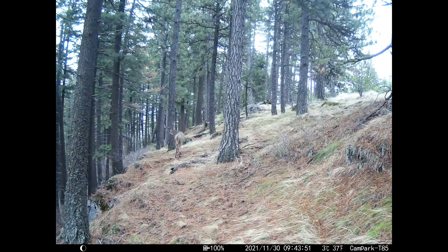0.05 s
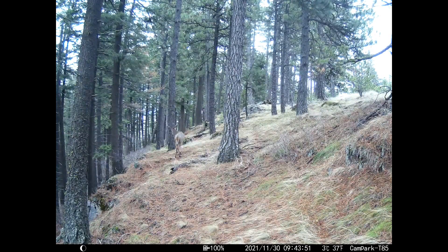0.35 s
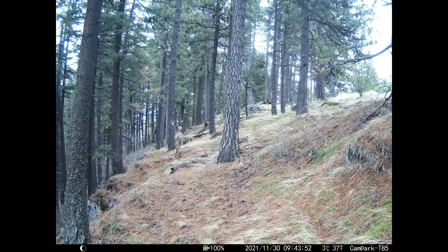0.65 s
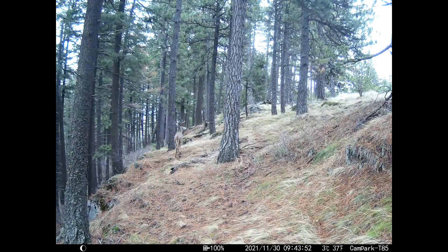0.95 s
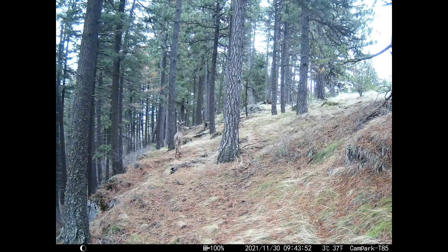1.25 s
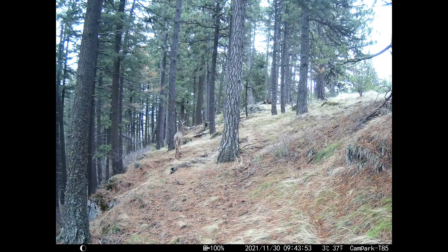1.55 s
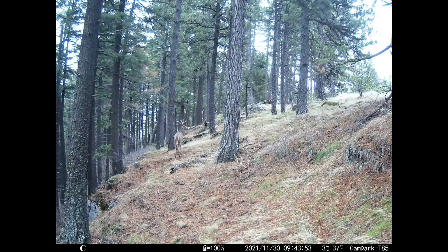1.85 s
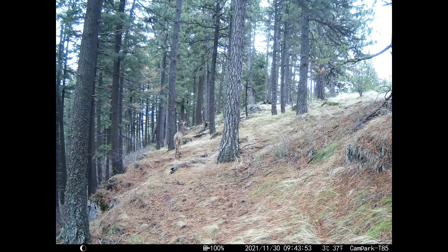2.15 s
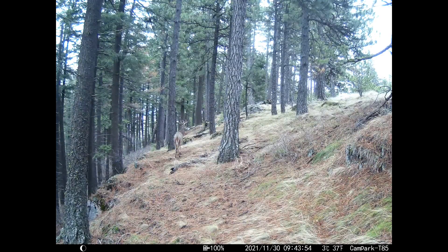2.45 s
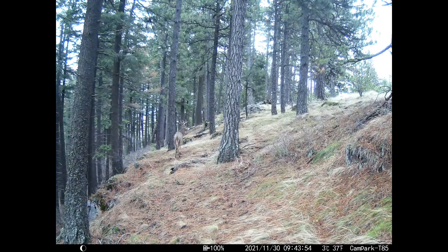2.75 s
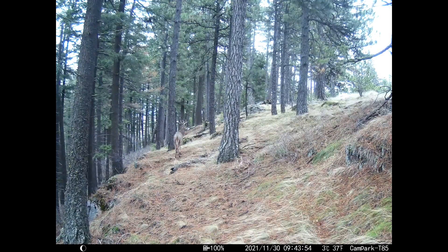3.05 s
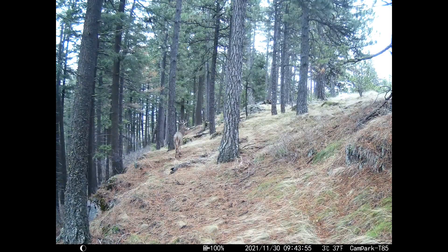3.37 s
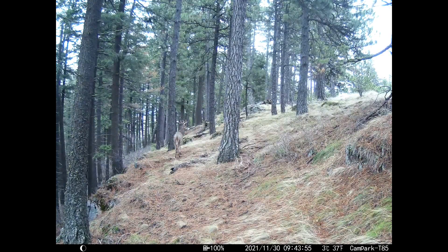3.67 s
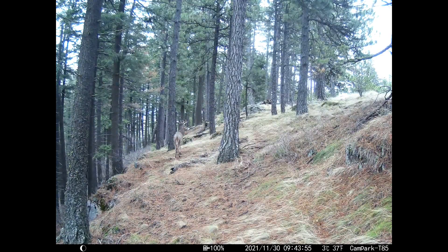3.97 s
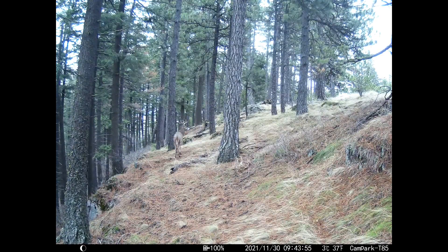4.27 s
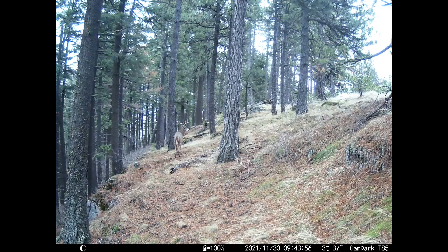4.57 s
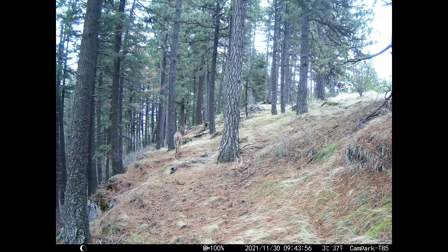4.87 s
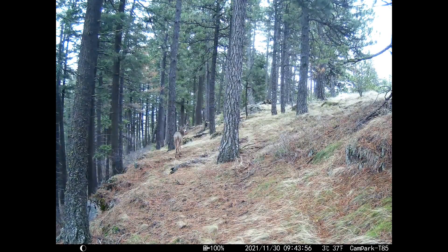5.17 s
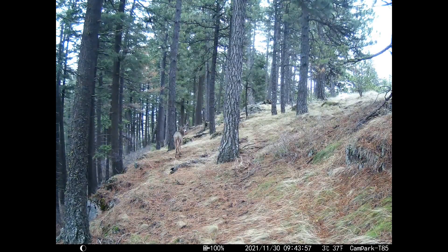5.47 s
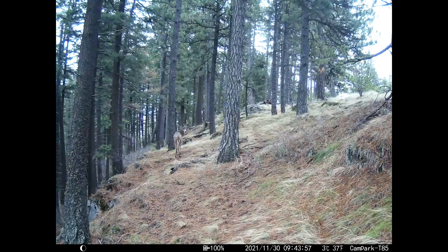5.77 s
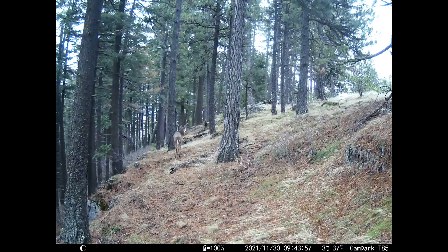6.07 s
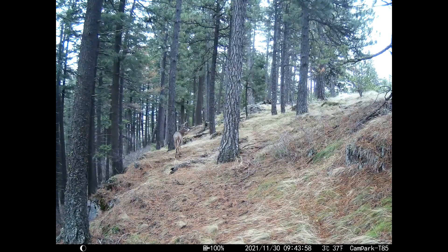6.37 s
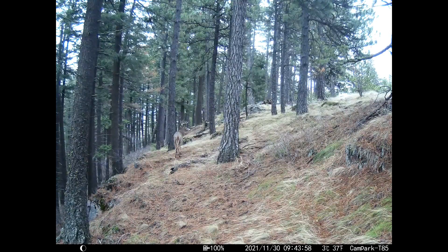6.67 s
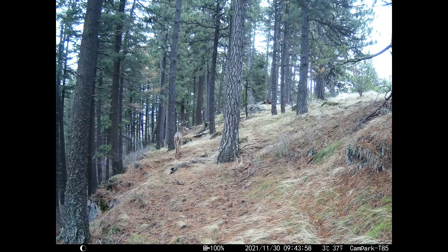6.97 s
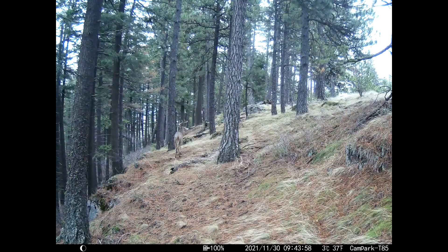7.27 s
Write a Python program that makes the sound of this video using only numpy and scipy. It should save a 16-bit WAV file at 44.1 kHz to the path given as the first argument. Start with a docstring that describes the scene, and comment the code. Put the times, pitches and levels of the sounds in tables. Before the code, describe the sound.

A quiet forest slope is heard in mono, with steady microphone hiss, softly murmuring air and a very faint, wavering low drone throughout. Thin, high chirps sit faintly in the hiss, each about a tenth of a second long and always at the same pitch. They sound like a fluttering electrical whine, with a tiny grainy scratch near the start and end. They come at about 0.3, 1.0, 1.8, 2.8, 3.6, 4.3, 5.3, 6.2 and 6.9 seconds. Light wind rumbles on the microphone, with a small bump at 1.4 seconds. From about 4.1 to 5.1 seconds a gust brings a cluster of low thumps, loudest at 4.2 and strong again at 4.8. A softer, deeper bump follows near 5.8 seconds. The wind then eases, and the hiss and air continue until about 7.4 seconds.

```python
"""Faint, thin chirps from a trail camera on a quiet forest slope. They keep one pitch, most likely a coil
singing under bursts of load, and each catches on a grainy scratch near its start and its end.
Wind rumbles and bumps on the microphone. Behind it sits a bed of softly murmuring air,
amplifier hiss and a faint, wavering low drone. Everything repeats weakly 50 ms later. Mono."""
import sys
import numpy as np
from scipy.fft import rfft, irfft, next_fast_len
from scipy.io import wavfile
from scipy.ndimage import map_coordinates

SR = 44100
rng = np.random.default_rng(int(sys.argv[2]) if len(sys.argv) > 2 else 0)


def materialize(psi):
    """Save the field psi as 16-bit PCM at rate SR to the path in sys.argv[1].

    A 1-D psi becomes a single channel; in a 2-D psi each row is a channel.
    """
    bounded = np.clip(np.atleast_2d(psi).T, -1, 1)
    quanta = np.round(bounded * 32767).astype(np.int16)
    wavfile.write(sys.argv[1], SR, quanta)


N = 327222
T = np.arange(N) / SR

# tone colour of the air in the trees: frequency_hz, relative_db
AIR_SPECTRUM = [(30, -29), (120, -0.5), (220, 0), (420, -2), (650, -6.5), (1000, -13), (2000, -22),
                (5000, -61)]
# tone colour of the amplifier hiss: frequency_hz, relative_db
HISS_SPECTRUM = [(100, 0), (2000, 0), (4200, -.2), (6000, .7), (7800, 1.2), (9300, .5), (11500, -1.2),
                 (14000, -.3), (15000, -2.7), (15700, -8)]
# tones of the drone, before swell and waver: pitch_hz, level_db
DRONE_TONES = [(101, -69), (121.5, -70), (184, -64.5)]
# slow fader ride on the drone: time_s, gain_db
DRONE_RIDE = [(0, -0.5), (.4, 2.5), (1.2, -3), (1.5, 4), (2.6, -4.5), (6.6, -3.5), (7.05, 3.5), (7.42, -3)]
# rise and fall of the wind: time_s, strength_db
WIND_STRENGTH = [(0.0, -63), (0.66, -62.5), (1.49, -57), (2.35, -63.5), (3.47, -63.5), (3.91, -57),
                 (4.28, -46.5), (5.41, -58), (5.66, -61), (5.87, -50), (6.3, -64), (7.42, -55.5)]
# tone colour of wind on the microphone: frequency_hz, relative_db
RUMBLE_SPECTRUM = [(8, -14), (18, 1), (30, -1), (50, -7), (70, -5), (105, -9), (150, -15), (300, -46.5)]
# eddies that bump the microphone: centre_s, level_db, pitch_hz
PUFF_CUES = [(1.399, -37.5, 52), (4.096, -25, 63.5), (4.177, -12, 79.6), (4.206, -25, 90), (4.363, -26, 39),
             (4.485, -22.5, 78), (4.511, -31.5, 36), (4.785, -27, 53.4), (4.811, -17, 50.6),
             (4.866, -29.5, 48.6), (4.906, -29, 50.3), (5.057, -33, 42), (5.836, -23, 34.7),
             (6.002, -33.5, 39.6)]
# tone colour of the rasp in chirps and scratches: frequency_hz, relative_db
RASP_SPECTRUM = [(1000, -23), (2800, 2.5), (4500, 0), (6500, 7), (8500, 2), (10500, -1), (15000, -16)]
# overtones 2 to 5 of the coil, whose fundamental is silent: relative_db
COIL_OVERTONES = [.6, -2.2, -7, -13]
# bursts of load on the coil: start_s, end_s, level_db, swell_db, closing_scratch_db
CHIRP_CUES = [(.31, .44, -64, 0, -60), (1.005, 1.105, -63.5, -2, -70), (1.81, 1.928, -65, 1, -58),
              (2.805, 2.92, -64, 0, -64), (3.615, 3.715, -65.5, 0, -60), (4.325, 4.422, -61.5, 7, -64),
              (5.305, 5.425, -64, 2, -63), (6.205, 6.305, -65.6, 3, -70), (6.905, 7.018, -65.3, 1, -62)]


def amp(db):
    """Decibels to gain."""
    return 10 ** (np.asarray(db) / 20)


def unit(x):
    """x at rms 1."""
    return x / np.sqrt(np.mean(x ** 2) + 1e-20)


def envelope(points):
    """Straight ramps through (time, value) points."""
    return np.interp(T, *np.transpose(points))


def wobble(rate):
    """A smooth random curve, rate knots a second."""
    return map_coordinates(rng.standard_normal(int(N * rate / SR) + 4), [T * rate])


def filtered(x, response):
    """x through a frequency response."""
    size = next_fast_len(N + SR // 2)
    return irfft(rfft(x, size) * response(np.fft.rfftfreq(size, 1 / SR)), size)[:N]


def noise(spectrum):
    """Noise of rms 1, coloured by a spectrum on a log frequency axis."""
    points_hz, db = np.transpose(spectrum)
    colour = lambda hz: amp(np.interp(np.log(hz + 1), np.log(points_hz), db))
    return unit(filtered(rng.standard_normal(N), colour))


def bell(centre_s, width_s):
    """A smooth, bell-shaped swell."""
    return np.exp(-.5 * ((T - centre_s) / width_s) ** 2)


def gust_db():
    """How far the wind is above or below its average."""
    wind_db = envelope(WIND_STRENGTH)
    return wind_db - wind_db.mean()


def amplifier_hiss(level_db=-54):
    """The microphone amplifier lays down an even hiss."""
    return amp(level_db) * noise(HISS_SPECTRUM)


def forest_air(level_db=-57, wind_follow=.12):
    """Air murmurs in the trees, a little louder in the gusts."""
    return amp(level_db + wind_follow * gust_db()) * noise(AIR_SPECTRUM)


def low_drone(waver_db=2.6, waver_rad=.97):
    """A few faint low tones waver in pitch and strength."""
    ride_db = envelope(DRONE_RIDE)
    drone = np.zeros(N)
    for hz, db in DRONE_TONES:
        level = amp(db + ride_db + waver_db * wobble(8))
        phase = 2 * np.pi * hz * T + waver_rad * wobble(8.2)
        drone += np.sqrt(2) * level * np.sin(phase)
    return drone


def wind_buffeting(level_db=-55, wind_follow=.82, lumps_db=2):
    """Light wind rumbles unevenly on the microphone port."""
    lumps = amp(lumps_db * wobble(8))
    return amp(level_db + wind_follow * gust_db()) * unit(lumps * noise(RUMBLE_SPECTRUM))


def wind_puffs(width_cycles=.45, steepen=.85, wake_db=-28, wake_width_s=.038):
    """Each eddy pushes and pulls the diaphragm once or twice and stirs the air around it."""
    push, wake = np.zeros(N), np.zeros(N)
    for centre_s, db, hz in PUFF_CUES:
        swing = 2 * np.pi * hz * (T - centre_s) + rng.uniform(0, 1)
        # the harder the puff, the steeper its swing and the stronger its octave
        thump = np.sin(swing) + steepen * amp(db) * np.sin(2 * swing)
        push -= amp(db) * bell(centre_s, width_cycles / hz) * thump  # big, slow eddies last longer
        wake += amp(db + wake_db) * bell(centre_s, wake_width_s)
    return push + wake * noise(RUMBLE_SPECTRUM)


def coil_scratches(gain_db=4.5, grain_db=3, width_s=.007, opening_boost_db=1):
    """Soon after it starts and just before it stops, the whine breaks up into a grainy scratch."""
    level = np.zeros(N)
    for start_s, end_s, db, _, closing_db in CHIRP_CUES:
        level += amp(db + opening_boost_db) * bell(start_s + .04, width_s)
        level += amp(closing_db) * bell(end_s - .01, width_s)
    grain = amp(grain_db * wobble(900))
    return amp(gain_db) * level * unit(grain * noise(RASP_SPECTRUM))


def coil_chirps(coil_hz=2826, flutter_hz=88, flutter_depth=.65, shimmer_db=2.5, fade_s=.005):
    """Each burst of load makes the coil sing: a fluttering whine with a little rasp."""
    load = np.zeros(N)
    for start_s, end_s, db, swell_db, _ in CHIRP_CUES:
        gate = np.clip(np.minimum(T - start_s, end_s - T) / fade_s + .5, 0, 1)
        progress = np.clip((T - start_s) / (end_s - start_s), 0, 1)
        load += gate * amp(db + swell_db * (progress - .5))
    # the coil is driven in quick, uneven packets, which puts sidebands round each overtone
    flutter = 2 * np.pi * flutter_hz * T + wobble(25)
    packets = (1 + flutter_depth * np.sin(flutter)) * amp(shimmer_db * wobble(250))
    # the pitch jitters, and lifts a little within each packet
    phase = 2 * np.pi * coil_hz * T - .22 * np.cos(flutter) + .26 * wobble(80)
    whine = sum(np.sqrt(2) * amp(db) * np.sin(k * phase) for k, db in enumerate(COIL_OVERTONES, 2))
    return load * (unit(packets) * whine + noise(RASP_SPECTRUM))


def scene():
    """Coil, wind and background bed; one microphone feeds both channels."""
    coil = coil_chirps() + coil_scratches()
    wind = wind_puffs() + wind_buffeting()
    bed = low_drone() + forest_air() + amplifier_hiss()
    mono = coil + wind + bed
    return np.array([mono, mono])


def record(dry):
    """One weak slapback on the whole mix, then the camera's band limit."""
    echo_gain, echo_s, top_hz = .19, .05, 15800
    response = lambda hz: (1 + echo_gain * np.exp(-2j * np.pi * hz * echo_s)) * (hz < top_hz)
    return np.array([filtered(channel, response) for channel in dry])


dry = scene()
out = record(dry)
materialize(out)
```